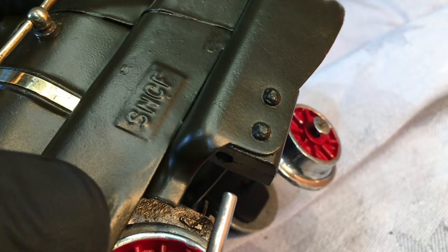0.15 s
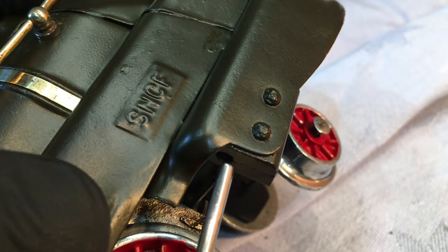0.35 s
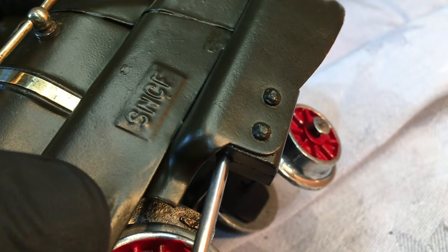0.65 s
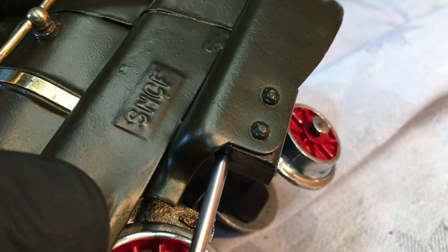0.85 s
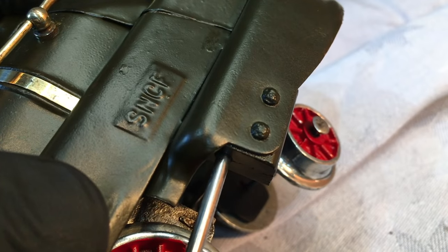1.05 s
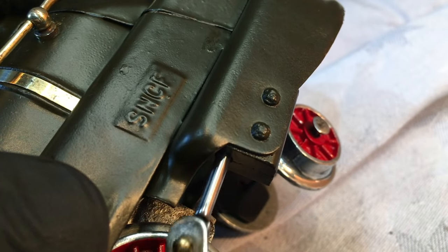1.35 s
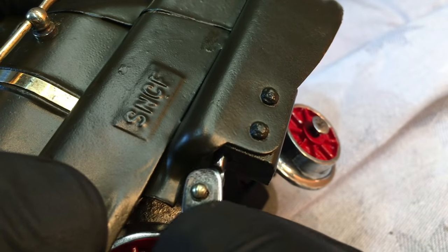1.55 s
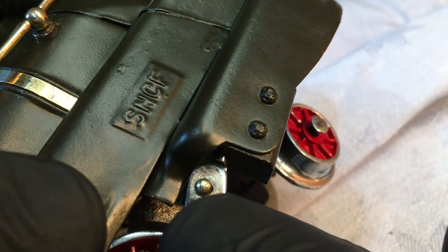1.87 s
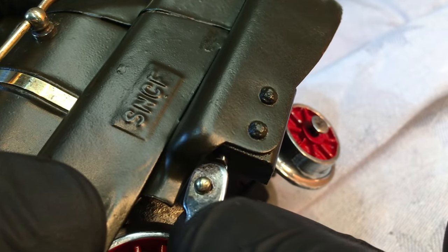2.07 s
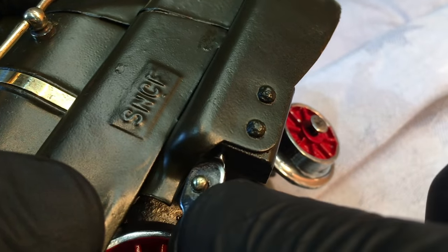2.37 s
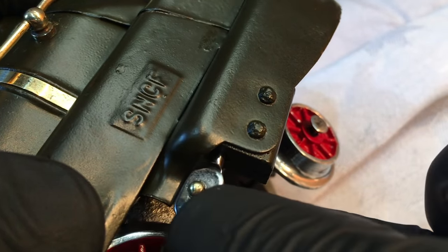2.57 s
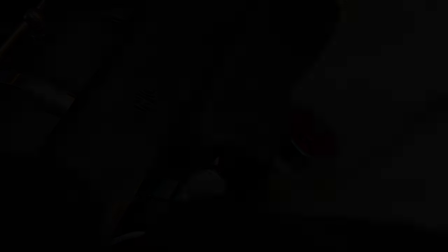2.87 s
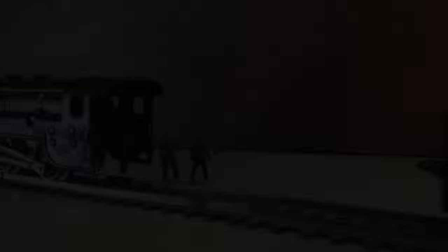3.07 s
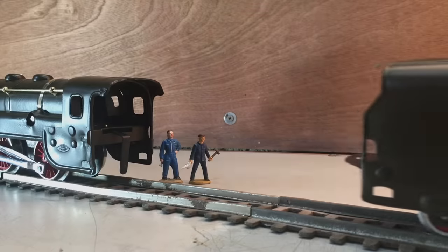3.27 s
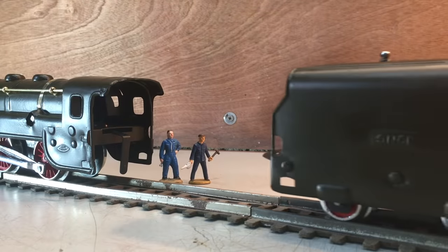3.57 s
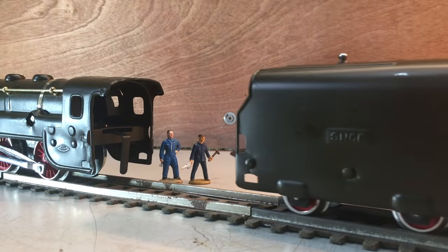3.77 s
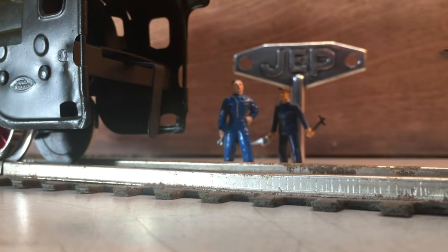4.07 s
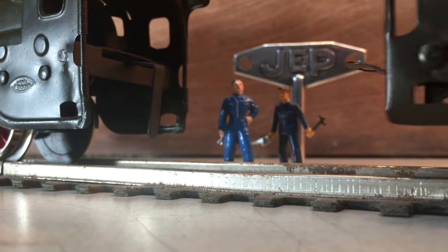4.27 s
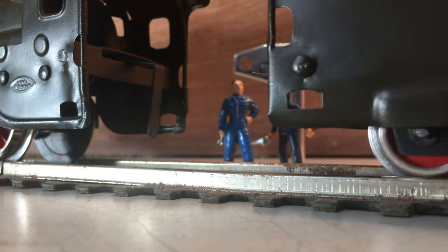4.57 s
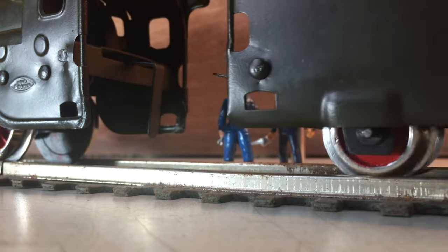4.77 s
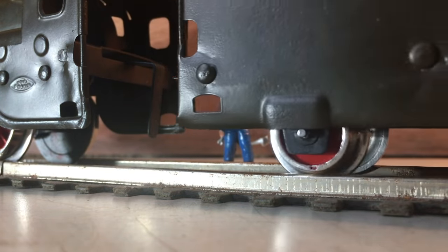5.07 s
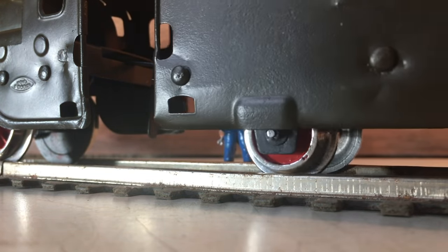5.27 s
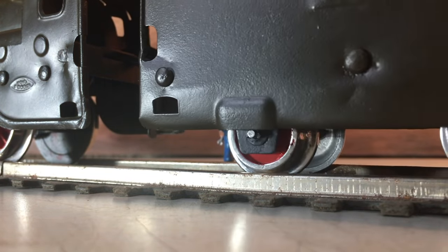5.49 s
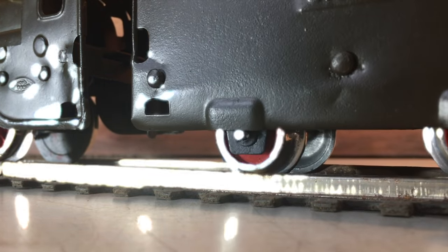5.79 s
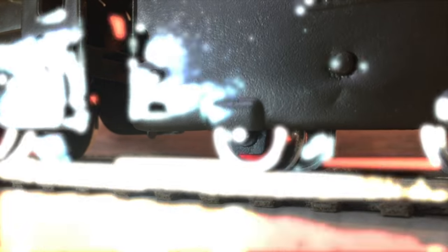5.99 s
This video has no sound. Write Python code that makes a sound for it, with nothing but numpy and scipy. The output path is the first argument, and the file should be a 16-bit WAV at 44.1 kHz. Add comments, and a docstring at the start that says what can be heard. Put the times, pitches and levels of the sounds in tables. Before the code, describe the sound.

A small quiet room with a soft low rumble, heard close to a tinplate toy locomotive on a table. After near silence, a faint double tap comes at 0.5 s. A very quiet, fine rod scrape runs from about 0.75 to 1.4 s, with light knocks and ticks. Two tiny ringing steel clicks fall at 1.43 s, a few taps follow, then a brighter double click at 2.17 s. At 2.64 s a sharp steel snap, by far the loudest sound, cracks and rings very high and briefly. Light knocks lead into a tin wagon rolling from 2.9 s: hollow rattle, clanks and wheel pings, strongest near 3.2 s, fading by 3.9. A second, heavier pass clatters from 4.07, with thuds and bright clanks around 4.4 to 4.8, thinning by 5.3. A clustered clank and dull table bump at 5.65 s end it, leaving faint hiss and rumble.

```python
"""A tinplate clockwork locomotive on a table, close by in a small quiet room with a low rumble of shaped noise.
Light taps on the body come first, as decaying noise; a steel rod then scrapes into the cab, as random grains.
A small steel tool snaps against the rod, as a noise crack and decaying sine modes that ring high.
Then the tin tender rolls by twice, the first time more softly: grains excite shell and wheel resonances,
the track drums and the table rumbles; struck resonances clank until it bumps to a stop."""
import sys
import numpy as np
from scipy import signal
from scipy.fft import rfft, irfft, next_fast_len
from scipy.io import wavfile
from scipy.ndimage import uniform_filter1d

SR = 44100
rng = np.random.default_rng(int(sys.argv[2]) if len(sys.argv) > 2 else 0)


def put_to_file(sound):
    """Save the sound as 16-bit audio at rate SR, in the file named by the first command-line argument."""
    columns = np.atleast_2d(sound).T  # one column per channel
    safe = np.clip(columns, -1, 1)
    whole_steps = np.round(safe * 32767)
    wavfile.write(sys.argv[1], SR, whole_steps.astype(np.int16))


N = 270493
TIME = np.arange(N) / SR  # s
AGE = TIME[:SR // 3]  # time since a blow, s


def amp(db):
    """Level is logarithmic: 20 dB is a tenfold amplitude."""
    return 10 ** (np.asarray(db) / 20)


def unit(x):
    """Normalise the standard deviation, the effective value of the fluctuation, to one."""
    return x / np.std(x)


def peak(x, db):
    """Short-time level: scale so that the loudest two milliseconds have this rms level."""
    power = uniform_filter1d(x ** 2, size=88, mode="constant")
    return x * amp(db) / np.sqrt(power.max())


def add(out, s, x):
    """Superposition: sum a short sound into the mix at time s."""
    i = int(s * SR)
    out[i:i + len(x)] += x[:N - i]


def fade(t60):
    """Exponential damping: the level falls by 60 dB in t60 seconds."""
    return np.exp(-np.log(1000) * AGE / t60)


def colour(x, points):
    """Minimum-phase filtering: a causal response follows from the gain at (Hz, dB) points alone."""
    size = 2 * next_fast_len(len(x))
    hz, db = np.transpose(points)
    bins = np.fft.rfftfreq(size, 1 / SR) + 1
    log_gain = np.log(amp(np.interp(np.log(bins), np.log(hz), db)))
    # folding the cepstrum onto positive time makes the response causal
    cepstrum = irfft(log_gain)
    cepstrum[1:size // 2] *= 2
    cepstrum[size // 2 + 1:] = 0
    return irfft(rfft(x, size) * np.exp(rfft(cepstrum)))[:len(x)]


def resonate(x, modes):
    """Forced vibration: (Hz, width, dB) resonances respond in parallel, neighbours with opposite sign."""
    out = 0
    for k, (hz, width, db) in enumerate(modes):
        b, a = signal.iirpeak(hz, hz / width, fs=SR)
        out = out + (-1) ** k * amp(db) * signal.lfilter(b, a, x)
    return out


def burst(t60):
    """Chattering contact: white noise under exponential damping."""
    return rng.standard_normal(len(AGE)) * fade(t60)


def soft(t60, rise):
    """Compliant contact: the noise builds up for a moment before it dies away."""
    return burst(t60) * (1 - np.exp(-AGE / rise))


def walk(rate):
    """Random modulation: straight lines join random values, rate per second, with a spread of one."""
    knots = rng.standard_normal(N // 50)
    return unit(np.interp(TIME * rate, np.arange(len(knots)), knots))


def grains(rate, spread_db):
    """Shot noise: random tiny impacts, rate per second, a few much harder than the rest."""
    size = amp(spread_db * np.minimum(rng.exponential(size=N), 5))
    hits = rng.random(N) < rate / SR
    return unit(hits * size * rng.choice([-1, 1], N))


def swell(start, length, attack, release):
    """Amplitude envelope: a Gaussian rise up to start, a hold for length, an exponential decay."""
    early, late = np.maximum(start - TIME, 0), np.maximum(TIME - start - length, 0)
    return np.exp(-(early / attack) ** 2 - late / release)


# Spectrum of the steady low room rumble. Each row: frequency in Hz, gain in dB.
QUIET_COLOUR = [(20, -0.5), (45, -0.5), (85, -3.5), (125, -14.5), (170, -17.5), (200, -22), (255, -19.5),
                (350, -27), (700, -29.5), (2000, -32.5), (6000, -35.5), (9700, -36.5), (10300, -44),
                (11000, -36.5), (16000, -39.5)]
QUIET_DB = -63
# Spectrum of the soft hiss, also of the snaps' wash and the rolling hiss. Each row: frequency in Hz, gain in dB.
HISS_COLOUR = [(200, 1), (900, 1), (3500, 1), (4600, 3), (6000, -0.5), (10300, -3), (12000, 2), (16000, -1)]
# Spectrum of the deep rumble. Each row: frequency in Hz, gain in dB.
DRONE_COLOUR = [(15, -10), (35, 1), (60, 1), (90, -20), (150, -19), (400, -52)]
# The soft hiss comes and goes. Each row: start in seconds, length in seconds, level in dB.
HISSES = [(0.81, 0.11, -69.5), (1.997, 0.097, -74.5), (2.837, 0.032, -67), (5.827, 0.38, -69)]
HISS_ATTACK_S, HISS_RELEASE_S = 0.035, 0.063
# The deep rumble swells in the room. Each row: start in seconds, length in seconds, level in dB.
DRONES = [(3.2, 1, -64.5), (4.15, .7, -57), (5.627, 0.58, -59.5)]
DRONE_ATTACK_S, DRONE_RELEASE_S = 0.1, 0.39


def background():
    """Stationary noise: low room rumble is constant, while a deep rumble and a soft hiss come and go."""
    colours = (QUIET_COLOUR, DRONE_COLOUR, HISS_COLOUR)
    quiet, drone, hiss = (unit(colour(rng.standard_normal(N), c)) for c in colours)
    drone_level = sum(amp(db) * swell(start, length, DRONE_ATTACK_S, DRONE_RELEASE_S)
                      for start, length, db in DRONES)
    hiss_level = sum(amp(db) * swell(start, length, HISS_ATTACK_S, HISS_RELEASE_S)
                     for start, length, db in HISSES)
    return amp(QUIET_DB) * quiet + drone_level * drone + hiss_level * hiss


# Light taps of the rod and fingers on the locomotive. Each row: time in seconds, body level in dB,
# treble tick level in dB, ring frequency in Hz, ring level in dB.
TAPS = [(0.494, -64.5, -83, 880, -58.5), (0.503, -60, -90, 1700, -65.5), (0.925, -71, -61, 2410, -62.5),
        (1.128, -75, -54.5, 756, -64), (1.144, -60.5, -54, 6600, -45.5), (1.209, -84, -82, 800, -57),
        (1.305, -52, -71, 650, -52.5), (1.564, -61, -52.5, 880, -53.5), (1.622, -68, -65, 6570, -65.5),
        (1.680, -52.5, -55.5, 5060, -52), (2.058, -63.5, -63, 2100, -66.5), (2.213, -54, -57, 1576, -54),
        (2.286, -67, -67, 4150, -73), (2.482, -57.5, -65, 704, -54.5), (2.574, -71, -65, 2670, -64),
        (2.72, -61, -63, 2600, -66), (2.822, -49.5, -46, 3630, -46.5), (2.839, -61, -55, 7600, -57.5),
        (2.928, -50.5, -50.5, 4350, -55), (2.943, -59, -77, 1840, -48.5), (2.953, -49, -52.5, 6860, -58.5)]
# Spectrum of the body knock. Each row: frequency in Hz, gain in dB.
TAP_BODY = [(100, -4), (400, -12.5), (700, 0), (1200, -7), (1700, 0), (2200, -6.5), (2700, -0.5),
            (4100, -9), (5200, -24.5), (9000, -29)]
# Spectrum of the treble tick. Each row: frequency in Hz, gain in dB.
TAP_TICK = [(1500, -31.5), (4000, 0.5), (6500, -5.5), (9000, -5), (10300, -11), (11800, -2.5), (16000, -17)]


def taps():
    """Local excitation: each knock on the body adds a tick and the ring of the spot that is touched."""
    out = np.zeros(N)
    for s, body_db, tick_db, ring_hz, ring_db in TAPS:
        body = colour(soft(t60=0.034, rise=0.00079), TAP_BODY)
        tick = colour(soft(t60=0.016, rise=0.00036), TAP_TICK)
        spot = resonate((AGE == 0) + amp(-2.5) * burst(0.023), [(ring_hz, 110, 0)])
        add(out, s, peak(body, body_db) + peak(tick, tick_db) + peak(spot, ring_db))
    return out


def room(x, wet_db, t60):
    """Diffuse reverberation: convolution with decaying noise gives a faint tail from the walls."""
    tail = burst(t60) * (1 - np.exp(-AGE / 0.0033))
    return x + amp(wet_db) * signal.fftconvolve(x, tail / np.linalg.norm(tail))[:N]


# Strokes of the rod, with levels before the wander of the scrape.
# Each row: start in seconds, length in seconds, hiss level in dB, dull drag level in dB.
STROKES = [(0.743, 0.28, -73.5, -78), (1.13, .12, -64.5, -74), (1.277, 0.16, -73.5, -83)]
STROKE_ATTACK_S, STROKE_RELEASE_S = 0.035, 0.093
# Spectrum of the fine scrape. Each row: frequency in Hz, gain in dB.
SCRAPE_COLOUR = [(3000, -18.5), (4900, -18), (5700, -4), (6700, -3.5), (9000, -8.5), (10300, -17.5),
                 (16000, -21)]


def rod():
    """Sliding friction: the rod hisses in the hole and catches on the resonant body in tiny knocks."""
    scrape = unit(colour(grains(9000, 2.5), SCRAPE_COLOUR)) * amp(3.0 * walk(45))
    body_modes = [(650, 220, 1.0), (920, 190, 3.0), (1570, 280, -8), (2700, 470, -7)]
    drag = unit(resonate(grains(70, 2.7), body_modes))
    out = np.zeros(N)
    for start, length, hiss_db, drag_db in STROKES:
        envelope = swell(start, length, STROKE_ATTACK_S, STROKE_RELEASE_S)
        out += envelope * (amp(hiss_db) * scrape + amp(drag_db) * drag)
    return out


# Heavy jolts that reach the table top. Each row: time in seconds, level in dB.
THUMPS = [(1.124, -51), (3.229, -45), (4.138, -43), (4.508, -40), (4.534, -42), (4.663, -43),
          (5.075, -49.5), (5.659, -36.5), (5.694, -45.5)]
# Spectrum of the table, also of its rumble in rolling. Each row: frequency in Hz, gain in dB.
TABLE_COLOUR = [(25, 0), (60, -9), (105, 7.5), (170, 1), (230, -11.5), (350, -16.5), (550, -18.5),
                (1200, -51)]


def thumps():
    """Structure-borne sound: each heavy jolt is a soft burst filtered by the table top."""
    out = np.zeros(N)
    for s, db in THUMPS:
        add(out, s, peak(colour(soft(t60=0.081, rise=0.0013), TABLE_COLOUR), db))
    return out


def ring(modes):
    """Free vibration: struck steel sounds as a sum of damped sines."""
    return sum(amp(db) * np.sin(2 * np.pi * hz * AGE) * fade(t60) for hz, db, t60 in modes)


# Steel snaps and their rebounds. Each row: time in seconds, tool ring level in dB, rod ring level in dB,
# crack level in dB, casing level in dB.
SNAPS = [(1.4270, -39.5, -35, -71, -58), (1.4352, -42, -45.5, -68, -55), (2.1595, -69, -76, -59, -78),
         (2.1739, -38, -39.5, -44, -55), (2.1809, -34.5, -67, -50, -51), (2.508, -66.5, -69, -64, -53.5),
         (2.6417, -18.5, -51.5, -22, -33), (2.6435, -37, -41, -32, -36.5)]
# Modes of the small steel tool, with a faint long after-ring.
# Each row: frequency in Hz, relative level in dB, 60 dB decay time in seconds.
TOOL_MODES = [(7190, -15, 0.034), (7150, -35.5, .23), (12100, -7, 0.027), (11860, -1, 0.065),
              (11862, -36, 0.24)]
# Modes of the steel rod. Each row: frequency in Hz, relative level in dB, 60 dB decay time in seconds.
ROD_MODES = [(1516, -15, 0.071), (3927, 0, 0.043), (6750, -9, 0.037), (7170, 5, 0.033), (7470, -1.5, .03),
             (12390, -7.5, 0.046), (12270, -27, .035)]
# Spectrum of the crack of steel on steel. Each row: frequency in Hz, gain in dB.
CRACK_COLOUR = [(200, -33), (1100, -18), (2000, -11.5), (3300, -7), (5400, -19.5), (6700, 1), (9500, -16.5),
                (11400, -2), (12800, -12.5), (14700, 4), (16500, -7)]
# Resonances of the cab casing. Each row: frequency in Hz, width in Hz, gain in dB.
CASING_MODES = [(233, 55, -0.5), (658, 51, 6.5), (1710, 53, -2), (2638, 108, 1), (3374, 100, 7),
                (3900, 170, 10.5), (4646, 300, 2.5), (5010, 81, 0)]
WASH_DB, WASH_T60_S = -31, 0.22  # the bright wash with a crack, relative to it


def snaps():
    """Impact: a broadband crack, duller chatter and wash, a casing knock, then tool and rod ring freely."""
    out = np.zeros(N)
    for s, tool_db, rod_db, crack_db, casing_db in SNAPS:
        chatter = colour(burst(0.023), [(1000, -1.5), (11500, 0.5), (14000, -8.5)])
        crack = colour(burst(0.0017) + amp(-11) * chatter, CRACK_COLOUR)
        wash = colour(soft(WASH_T60_S, rise=0.0052), HISS_COLOUR)
        casing = resonate((AGE == 0) + amp(-16.5) * burst(0.01), CASING_MODES)
        rings = peak(ring(TOOL_MODES), tool_db) + peak(ring(ROD_MODES), rod_db)
        contact = peak(crack, crack_db) + peak(wash, crack_db + WASH_DB)
        add(out, s, rings + contact + peak(casing, casing_db))
    return out


def struck(modes, vary_db, detune):
    """Modal participation: each contact point favours other resonances and shifts them a little."""
    chance = rng.standard_normal((len(modes), 2))
    return [(hz * (1 + detune * a), width, db + vary_db * b)
            for (hz, width, db), (a, b) in zip(modes, chance)]


def flurries(modes, rate, spread_db, count):
    """Load sharing: several contacts take turns, so the colour of the rattle keeps shifting."""
    load = np.array([amp(6.7 * walk(40)) for _ in range(count)])
    load /= np.linalg.norm(load, axis=0)
    out = np.zeros(N)
    for share in load:
        contact = resonate(grains(rate, spread_db), struck(modes, vary_db=3.5, detune=0.0092))
        out += share * contact
    return unit(out)


def drum(hz):
    """Narrow-band noise: a track resonance shaken at random wanders in amplitude and phase."""
    phase = 2 * np.pi * hz * TIME
    return unit(walk(60) * np.cos(phase) + walk(60) * np.sin(phase))


# The tender rolls by twice, with rumble and hiss drives as at a rattle of FIRM_DB.
# Each row: start in seconds, end in seconds, table rumble drive in dB, wheel hiss drive in dB, track drum in Hz.
PASSES = [(2.845, 3.87, -54.5, -76, 104.1), (4.071, 5.3, -47.5, -72, 156.8)]
PASS_ATTACK_S, PASS_RELEASE_S = 0.014, 0.12
# How hard the rails shake the tender. Each row: time in seconds, shell rattle drive in dB.
SHAKE = [(2.8, -86), (2.88, -70), (3.02, -64), (3.1, -55.5), (3.34, -53), (3.5, -59.5), (3.68, -66),
         (4.05, -65), (4.09, -55.5), (4.17, -51), (4.29, -59.5), (4.41, -51), (4.6, -63.5), (4.82, -61.5),
         (4.93, -73), (5.02, -64.5), (5.38, -73), (5.5, -90)]
FIRM_DB, CHATTER_DB = -52.5, -65  # drive of a firm rattle, and of the wheel chatter that goes with it
CHATTER_SLOPE, RUMBLE_SLOPE, HISS_SLOPE = 1.1, 0.41, 1  # dB per dB of rattle
LURCH_DB, LURCH_PER_S, JOLT_DB, JOLT_PER_S = 1.5, 28, 1.27, 130  # the rattle comes in uneven spurts
# Resonances of the tin shell, also in clanks. Each row: frequency in Hz, width in Hz, gain in dB.
SHELL_MODES = [(388, 190, -15.5), (705.6, 32, 3), (800, 70, -4.5), (863, 14.6, 5), (1060, 190, -5.5),
               (1367, 54, -3.5), (1636, 144, -3.5), (1886, 51, -2.5), (2070, 127, -3.5), (2490, 230, -10),
               (2713, 92, -5.5), (3113, 96, -6), (3515, 310, -16.5), (4430, 480, -23.5)]
# Resonances of wheels and axles, also in clanks. Each row: frequency in Hz, width in Hz, gain in dB.
WHEEL_MODES = [(4360, 1860, -14.5), (5670, 230, -2), (5730, 190, -1), (5730, 91, -5), (7030, 600, -9),
               (7220, 770, -12.5), (9080, 900, -17.5), (12000, 810, -21.5), (13900, 2100, -25)]


def rolling():
    """Roughness excitation: one shaking by the rails drives shell, wheels, drumming track and table."""
    shake = np.interp(TIME, *np.transpose(SHAKE), left=-120) - FIRM_DB  # dB above a firm rattle
    rattle, chatter = amp(FIRM_DB + shake), amp(CHATTER_DB + CHATTER_SLOPE * shake)
    jolt = amp(JOLT_DB * walk(JOLT_PER_S) + LURCH_DB * walk(LURCH_PER_S))

    grit_colour = [(300, -14.5), (800, 6), (2500, -1.5), (4000, -7), (7000, -10.5), (16000, -37)]
    grit = unit(colour(grains(700, 4.6), grit_colour))
    shell = flurries(SHELL_MODES, rate=900, spread_db=3.0, count=4) + amp(-3.5) * grit
    # gentle rolling makes soft contacts and a duller rattle
    force = rattle / (rattle + amp(-58.5))
    dull_shell = colour(shell, [(900, 4), (2000, -4.5), (3200, -8.5), (8000, -17)])
    shell = force * shell + (1 - force) * dull_shell
    wheels = flurries(WHEEL_MODES, rate=310, spread_db=3.5, count=3)

    table = unit(colour(grains(1200, 1.4), TABLE_COLOUR))
    # the hollow sleepers sound when the wheels both rattle and press hard
    sleeper_colour = [(120, -24.0), (240, -1.5), (350, -2.5), (450, -4), (580, -24.5), (1500, -40.0)]
    sleepers = unit(colour(grains(1500, 1.65), sleeper_colour))
    hollow = amp(-6.0) * force * jolt * sleepers
    hiss = unit(colour(rng.standard_normal(N), HISS_COLOUR))

    out = jolt * (rattle * shell + chatter * wheels)
    for start, end, rumble_db, hiss_db, drum_hz in PASSES:
        ground = hollow + amp(-4.5) * table + amp(-3.5) * drum(drum_hz)
        rumble = amp(rumble_db + RUMBLE_SLOPE * shake) * ground
        wheel_hiss = amp(hiss_db + HISS_SLOPE * shake) * hiss
        out += swell(start, end - start, PASS_ATTACK_S, PASS_RELEASE_S) * (rumble + wheel_hiss)
    return out


# Wheels and coupling knock the tender. Each row: time in seconds, shell level in dB,
# wheel ping level in dB, ping frequency in Hz.
CLANKS = [(3.068, -47, -50.5, 5730), (3.109, -49, -59, 5340), (3.128, -56, -52, 5620),
          (3.187, -47.5, -46, 5800), (3.222, -43.5, -51, 5500), (3.245, -42, -46.5, 5700),
          (3.32, -46, -51, 5560), (3.345, -46, -49, 5770), (3.535, -54, -67.5, 5640),
          (3.587, -52.5, -63, 5640), (3.79, -55.5, -67, 5570), (3.911, -52, -59, 5550),
          (3.946, -48, -64, 5670), (4.067, -49, -66, 5950), (4.131, -40.5, -47, 5800),
          (4.145, -47, -50, 5600), (4.174, -40, -59, 5740), (4.213, -58, -53, 5630),
          (4.337, -42, -42.5, 6860), (4.392, -39.5, -43.5, 5450), (4.445, -41.5, -46, 5850),
          (4.495, -43.5, -38, 5730), (4.504, -43, -37.5, 5870), (4.521, -43.5, -57, 5740),
          (4.641, -45, -48, 5500), (4.658, -39, -49.5, 5200), (4.801, -39, -38.5, 5690),
          (5.012, -49, -80, 5370), (5.072, -45, -44, 5670), (5.149, -53, -51.5, 5740),
          (5.166, -53.5, -70, 5600), (5.213, -56, -70, 5520), (5.245, -53, -75, 5480),
          (5.265, -51, -60.5, 5600), (5.624, -45, -39.5, 5870), (5.645, -48.5, -50, 5810),
          (5.654, -44, -65, 5550), (5.661, -45, -55, 5870)]


def clanks():
    """Impact excitation: a wheel or coupling strikes with a short ping and the loose shell chatters on."""
    out = np.zeros(N)
    for s, shell_db, ping_db, ping_hz in CLANKS:
        blow = soft(t60=0.065, rise=0.00019) + amp(5.0) * soft(t60=0.011, rise=0.00024)
        shell = resonate(blow, struck(SHELL_MODES, vary_db=1.5, detune=0.011))
        # the struck wheel's own note stands out above the rest of the running gear
        gear = struck(WHEEL_MODES, vary_db=-0.5, detune=0.01) + [(ping_hz, 250, 3)]
        ping = resonate(soft(t60=0.019, rise=0.00069) + amp(-20) * burst(0.059), gear)
        add(out, s, peak(shell, shell_db) + peak(ping, ping_db))
    return out


def scene():
    """Linear superposition: the toy's sounds reverberate and add to the background."""
    toy = taps() + rod() + thumps() + snaps() + rolling() + clanks()
    return (room(toy, wet_db=-26.5, t60=0.33) + background())[None]


TOP_HZ = 16200


def record(dry):
    """Band limitation: a steep elliptic low-pass removes what lies above TOP_HZ."""
    low_pass = signal.ellip(10, 0.2, 70, TOP_HZ, fs=SR, output="sos")  # 0.2 dB ripple, 70 dB rejection
    return signal.sosfilt(low_pass, dry)


dry = scene()
out = record(dry)
put_to_file(out)
```